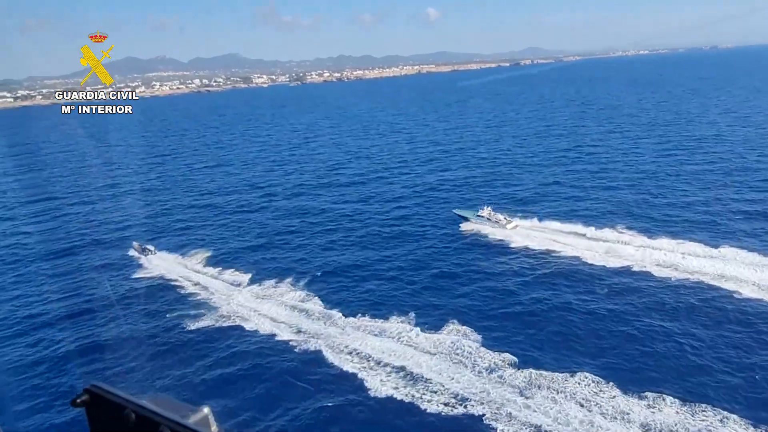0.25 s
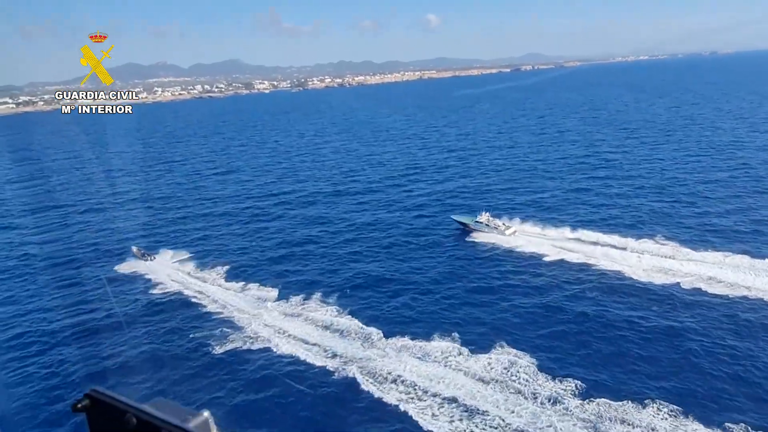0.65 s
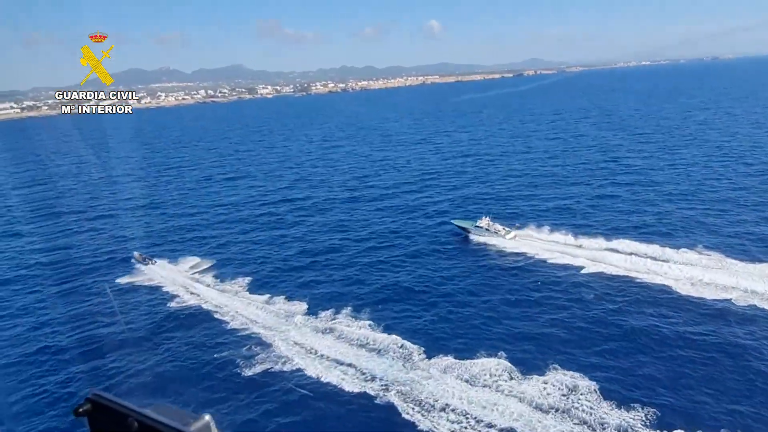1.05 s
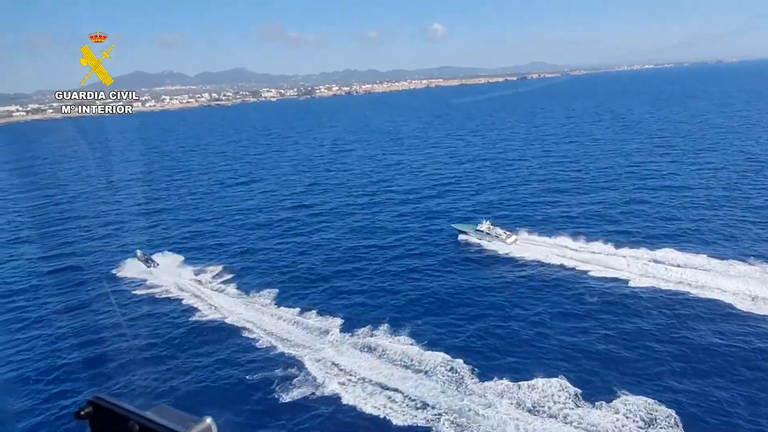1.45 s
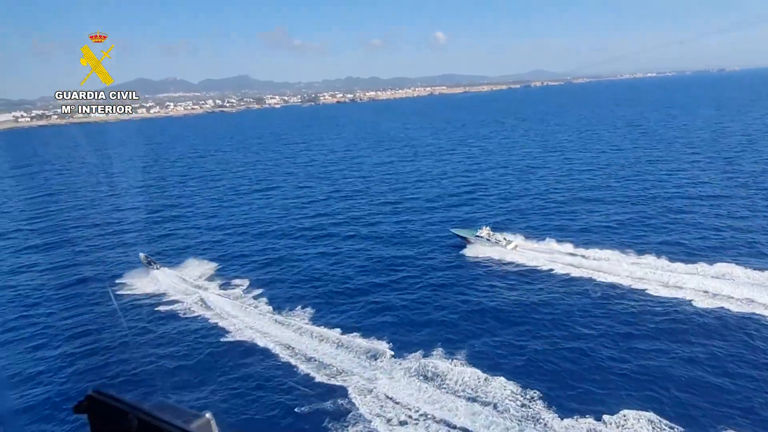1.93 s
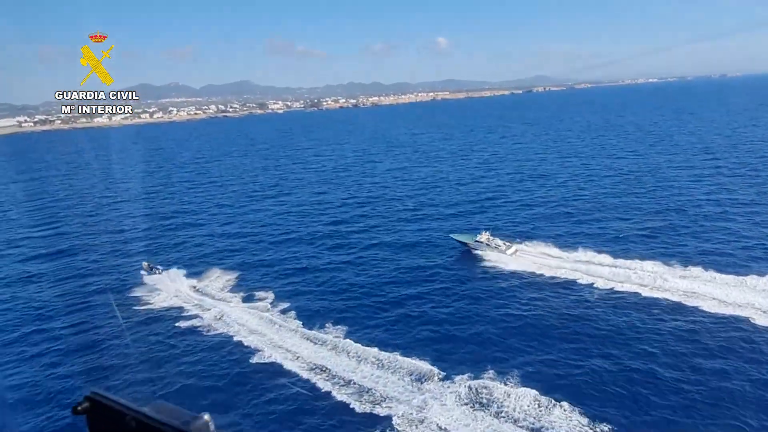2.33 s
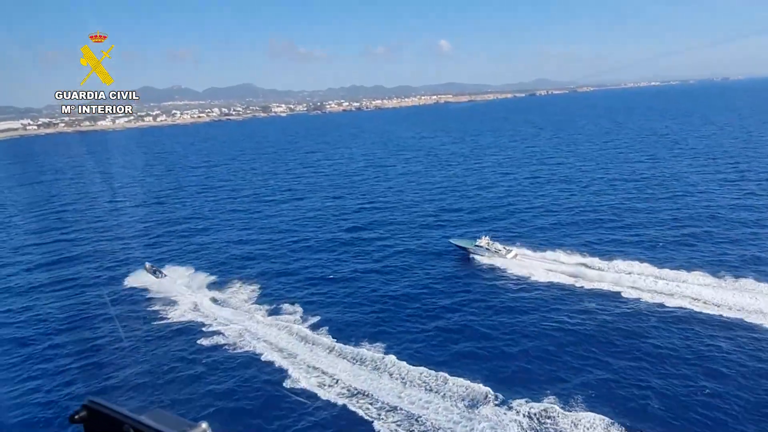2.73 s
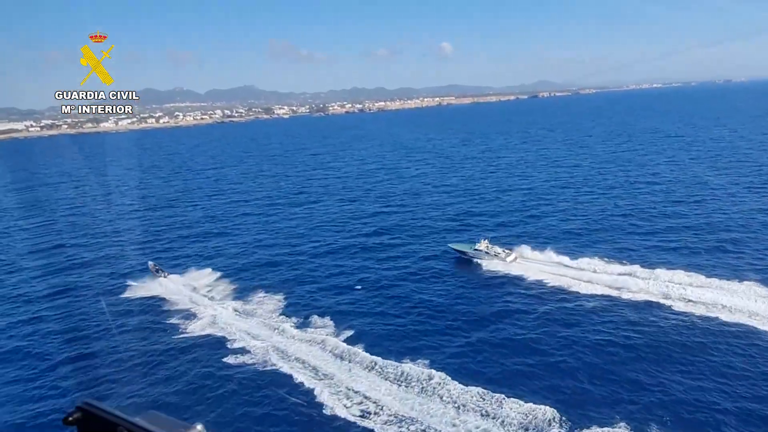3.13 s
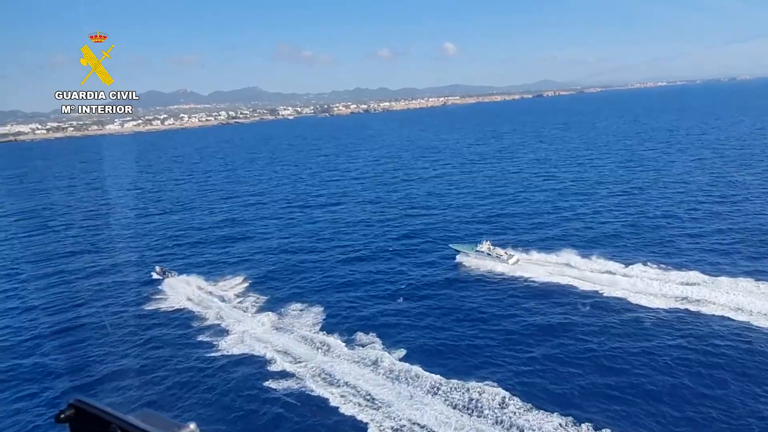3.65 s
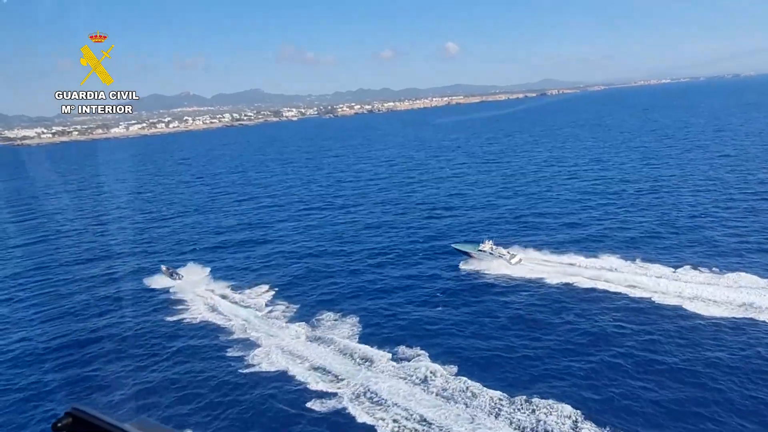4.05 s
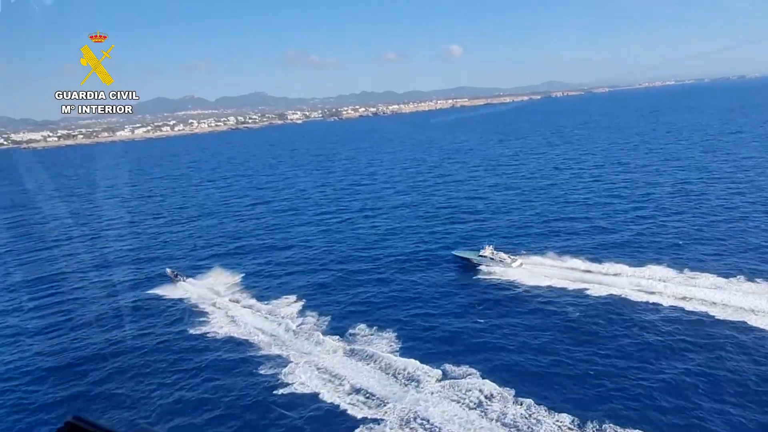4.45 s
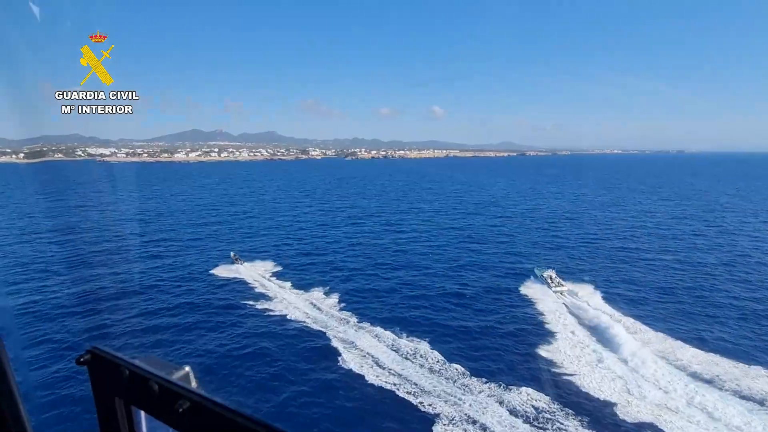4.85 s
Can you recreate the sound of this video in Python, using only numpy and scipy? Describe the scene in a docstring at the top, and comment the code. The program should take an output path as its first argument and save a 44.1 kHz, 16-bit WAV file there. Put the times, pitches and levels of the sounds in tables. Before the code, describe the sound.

Heard from inside a helicopter cabin, in stereo: loud booming air roar along the hull, a rapid deep rotor throb, a mid-pitched fan hum and a steady high gear whine stronger on the left. The rumble bumps briefly now and then, the air swells once midway, a low drone strengthens after four seconds, then everything cuts to silence.

```python
"""Inside the cabin of a turbine helicopter in steady flight, heard at two microphones, in stereo.
From the start, filtered noise roars along the hull, while sines make the tail fan's hum, the gearbox's whine
and the throb of the four-blade main rotor. The rumble surges briefly now and then, and the air swells once
after about two and a half seconds. A rotor drone grows strong after four seconds. Shortly afterwards
the sound is switched off, and silence follows."""
import sys
import numpy as np
from scipy import signal
from scipy.fft import rfft, irfft, next_fast_len
from scipy.io import wavfile

SR = 44100
rng = np.random.default_rng(int(sys.argv[2]) if len(sys.argv) > 2 else 0)


def wav_out(sig):
    """Save sig, one row per channel (or a flat mono array), as 16-bit PCM at SR to the path in sys.argv[1]."""
    wavfile.write(sys.argv[1], SR, np.round(np.clip(np.atleast_2d(sig).T, -1, 1) * 32767).astype(np.int16))


N = 224733
SECONDS = np.arange(N) / SR
# at nominal speed: turns of the rotor shaft per second, and pitch of the main gear teeth meeting
SHAFT_HZ, MESH_HZ = 6.795, 2330.4
BLADES = 4


def undb(db):
    """Decibels to gain."""
    return 10 ** (np.asarray(db) / 20)


def curve(table):
    """A table of (time, value) joined by straight lines, with a value at every sample."""
    return np.interp(SECONDS, *np.array(table).T)


def swing(table):
    """A curve at every sample, as its departure from the mean of the table's values."""
    times, values = np.array(table).T
    return np.interp(SECONDS, times, values - values.mean())


def over_pitch(hz, table, axis=1):
    """One column of a spectrum, joined by straight lines on a log-frequency axis."""
    rows = np.array(table)
    return np.interp(np.log(hz + 1), np.log(rows[:, 0]), rows[:, axis])


def spectrum_axis():
    """A fast transform length, and the frequency of each of its bins."""
    size = next_fast_len(N)
    return size, np.arange(size // 2 + 1) * SR / size


def walk(rate_hz):
    """Smooth random wandering of spread 1 that changes about rate_hz times a second."""
    size, hz = spectrum_axis()
    smooth = rfft(rng.standard_normal(size)) / (1 + (hz / rate_hz) ** 2)
    x = irfft(smooth, size)[:N]
    return x / x.std()


def tone(phase, left_db, right_db, lead_rad):
    """A sine as it reaches the two microphones, louder or earlier at one of them."""
    left = undb(left_db) * np.sin(phase + lead_rad)
    right = undb(right_db) * np.sin(phase)
    return np.sqrt(2) * np.array([left, right])  # so that the levels are RMS


def scattered(phase, rate_hz):
    """The part of a tone that comes by way of shaking panels, with wandering size and phase."""
    return (walk(rate_hz) * np.sin(phase) + walk(rate_hz) * np.cos(phase)) / np.sqrt(2)


# likeness of the rushing air at the two microphones: pitch_hz, correlation (1 same, -1 opposite)
LIKENESS = [(30, 0.88), (130, 0.97), (290, 0.86), (640, 0.53), (1400, -0.31), (3100, 0.16), (6800, -0.23),
            (15000, 0.042)]


def rushing_air(size, hz):
    """Spectrum of white noise from turbulent air, more or less alike at the two microphones."""
    alike = np.clip(over_pitch(hz, LIKENESS), -.99, .99)
    shared, opposed = rfft(rng.standard_normal((2, size))) * np.sqrt(SR / 2)
    opposed = opposed * np.array([[1], [-1]])
    return np.sqrt((1 + alike) / 2) * shared + np.sqrt((1 - alike) / 2) * opposed


# colour of the air along the hull, before trims: pitch_hz, left_db and right_db (dB per Hz)
HULL_ROAR = [(12, -59.5, -62.5), (36, -55.5, -57.5), (51.7, -45, -43.5), (80, -41, -43),
             (104, -43.5, -43.5), (129.3, -41, -40), (172, -49, -47), (192.7, -49.5, -44.5),
             (218.6, -40.5, -41), (246, -41, -41), (290, -41.5, -41), (325, -49, -43.5), (415, -46.5, -45),
             (510, -51.5, -51), (564, -48.5, -49.5), (844, -60, -52.5)]
# colour of the hiss of window seals and turbines, same columns
SEAL_HISS = [(860, -55.5, -57.5), (1260, -61.5, -56.5), (1800, -62, -59.5), (2130, -64.5, -65),
             (2940, -66, -68.5), (3125, -69.5, -71), (3960, -68, -76), (4800, -70.5, -76.5),
             (5690, -68.5, -80.5), (7660, -74, -81.5), (9100, -85.5, -86), (9840, -79, -80),
             (14000, -75, -80.5), (15600, -74.5, -80)]


def hull_colour_db(hz, ripple_db=1.32):
    """The hull and seals colour the noise; crowded cabin modes ripple it differently at each microphone."""
    rows = list(HULL_ROAR) + list(SEAL_HISS)
    colour_db = np.array([over_pitch(hz, rows, axis=c) for c in (1, 2)])
    modes_hz = np.geomspace(300, 9000, 220)
    for side in range(2):
        colour_db[side] += ripple_db * np.interp(hz, modes_hz, rng.standard_normal(len(modes_hz)), 0, 0)
    return colour_db


# narrow rushing bands of panels and seals, the highest from the compressor, before the 9 kHz dip:
# centre_hz, width_hz, left_db and right_db (dB per Hz)
WHISTLES = [(812, 40, -55, -54), (2545, 55, -58.5, -72), (2810, 40, -66, -66), (3250, 60, -66, -73),
            (4130, 70, -69, -85), (4485, 70, -62.5, -76), (5540, 220, -67, -77), (6425, 40, -70, -85),
            (12540, 480, -64, -68), (12556, 60, -55.3, -60)]


def whistling_bands(hz):
    """Panels, seals and compressor resonate in narrow bands; returns their power at each frequency."""
    power = 0
    for centre_hz, width_hz, left_db, right_db in WHISTLES:
        resonance = 1 / (1 + (2 * (hz - centre_hz) / width_hz) ** 2)
        power = power + undb([[left_db], [right_db]]) ** 2 * resonance
    # the microphones are nearly deaf to these bands around 9 kHz
    return power * np.clip(1.1 - np.exp(-((hz - 9000) / 1500) ** 2), 0, 1)


GUST_S, GUST_WIDTH_S, GUST_DB = 2.63, 0.2, 2


def gust_db():
    """The airflow swells once and eases off again; in dB."""
    return GUST_DB * np.exp(-((SECONDS - GUST_S) / GUST_WIDTH_S) ** 2)


# brief surges of the rumble: peak_s, centre_hz, lift_db (of the surging band)
SURGES = [(.14, 90, 5.5), (.22, 900, 2.5), (.45, 120, 1), (.7, 400, 3.5), (1.2, 105, 5.5), (1.75, 640, 5),
          (2.13, 240, 0.5), (2.2, 400, 0.5), (2.5, 600, 3.5), (2.78, 80, 6), (2.92, 240, 6),
          (3.04, 110, 4.5), (3.5, 110, 4), (3.88, 640, 4.5)]
# half length and half width of a surge
SURGE_S, SURGE_OCTAVES = .045, .55


def surging(sound):
    """Each surge lifts one region of the rumble for a moment."""
    size, hz = spectrum_axis()
    out, spectrum = sound, rfft(sound, size)
    for peak_s, centre_hz, lift_db in SURGES:
        octaves_away = np.log2((hz + 1) / centre_hz)
        band = irfft(spectrum * np.exp(-(octaves_away / SURGE_OCTAVES) ** 2), size)[:, :N]
        moment = np.exp(-((SECONDS - peak_s) / SURGE_S) ** 2)
        out = out + band * (undb(lift_db * moment) - 1)
    return out


# level of the cabin boom, used as departure from its mean: time_s, level_db
BOOM = [(0, -25), (.35, -20.5), (1, -20.5), (1.9, -22), (2.25, -17.5), (2.6, -24), (3, -18.5), (3.6, -19.5),
        (4.1, -20.5), (4.65, -21)]
BOOM_HZ, BOOM_WIDTH_HZ = 247, 84
# the wake of each blade beats on the hull and pulses the roar: multiple of the blade rate, depth_db
WAKE = [(1, .25), (2, .35), (3, .45)]


def airflow(turn, roar_db=-0.5, hiss_db=0.13, buffet_db=0.5, flicker_db=0.5, boom_waver_db=.9):
    """Turbulence heard through the hull: a booming roar that beats with the blades, and a smoother hiss."""
    size, hz = spectrum_axis()
    noise = rushing_air(size, hz)
    sound = noise * np.sqrt(undb(hull_colour_db(hz)) ** 2 + whistling_bands(hz))
    low = 1 / (1 + (hz / 1200) ** 2)  # the share of roar; the rest is hiss
    in_boom = np.exp(-((hz - BOOM_HZ) / BOOM_WIDTH_HZ) ** 2)
    boom = irfft(sound * low * in_boom, size)[:, :N]
    boom = boom * undb(swing(BOOM) + boom_waver_db * walk(5.4))
    rush = irfft(sound * low * (1 - in_boom), size)[:, :N]

    beat_db = sum(depth_db * np.cos(multiple * BLADES * turn) for multiple, depth_db in WAKE)
    roar = (boom + rush) * undb(roar_db + gust_db() + beat_db + buffet_db * walk(29))
    hiss = irfft(sound * (1 - low), size)[:, :N]
    hiss = hiss * undb(hiss_db + 0.5 * gust_db() + flicker_db * walk(40))  # the gust lifts hiss less
    return surging(roar) + hiss


# tail fan hum at nominal speed, before trims: pitch_hz, left_db, right_db, lead_rad (left leads)
FAN = (836.7, -34.7, -28.6, -.8)
# thrust of the tail fan, used as departure from its mean: time_s, level_db
THRUST = [(0, -34.5), (.3, -34), (.75, -36), (1.05, -38), (1.25, -37.5), (1.65, -34), (2.3, -35.5),
          (2.62, -32.5), (3, -33.5), (3.35, -33.5), (3.7, -37.5), (4.05, -39), (4.35, -32.5), (4.65, -34)]


def tail_fan(clock, fan_db=-0.53, scatter_db=-14, scatter_hz=7):
    """The fan blades hum on one pitch, louder with thrust; a little of it wavers through the panels."""
    pitch_hz, left_db, right_db, lead_rad = FAN
    phase = 2 * np.pi * pitch_hz * clock
    waver = np.array([undb(db + scatter_db) * scattered(phase, scatter_hz) for db in (left_db, right_db)])
    hum = tone(phase, left_db, right_db, lead_rad) + waver
    return undb(fan_db + swing(THRUST)) * hum


# shafts and lesser gears at nominal speed, before trims: pitch_hz, left_db, right_db, lead_rad (left leads)
SHAFT_TONES = [(98.7, -32, -32.3, .1), (101.3, -37.4, -31.8, .4), (241.1, -33.5, -28.5, -.2),
               (355.8, -35.5, -34, .1), (449, -45, -39.5, -.3), (672.2, -39, -38.4, -.8),
               (726.3, -55, -43, 2.4), (903.1, -44.4, -37.8, -2.9), (1237.5, -51, -49.5, 1.3),
               (1344.3, -52, -49, 2.5), (2016.3, -52, -45.7, -1), (2219.2, -60, -50, 0),
               (2563.3, -47.3, -59, -1.2), (2828.9, -42.7, -37.2, -2.1), (4661, -48.6, -62, -2.7),
               (5498.5, -47.3, -57.5, -2.2), (5657.6, -45.4, -53.3, 1.5), (6991.5, -54.3, -72, -2.5),
               (8486.5, -72, -66, 0)]


def drive_train(clock, tones_db=-0.6, scatter_db=-9, scatter_hz=6, scatter_db_per_octave=-1.8):
    """Shafts and gears turn in fixed ratio; a share of each tone wavers, smaller for the high ones."""
    out = 0
    for pitch_hz, left_db, right_db, lead_rad in SHAFT_TONES:
        phase = 2 * np.pi * pitch_hz * clock + rng.uniform(0, 2 * np.pi)
        share_db = scatter_db + scatter_db_per_octave * np.log2(pitch_hz / MESH_HZ)
        waver = np.array([undb(db + share_db) * scattered(phase, scatter_hz) for db in (left_db, right_db)])
        out = out + tone(phase, left_db, right_db, lead_rad) + waver
    return undb(tones_db) * out


# main gear whine, before torque and flutter: left_db, right_db, lead_rad (left leads)
MESH = (-26, -36.5, -0.86)
# torque on the main gears, used as departure from its mean: time_s, level_db
TORQUE = [(0, -32.5), (.55, -33.5), (.87, -31.8), (1.02, -33.2), (1.22, -32), (1.55, -32.5), (2.1, -33),
          (2.52, -31.3), (2.65, -32.5), (3.05, -32), (3.5, -32.5), (4.05, -33.5), (4.35, -32.8), (4.6, -31)]
# the input shaft shakes the mesh at its own rate (at nominal speed)
INPUT_SHAFT_HZ = 101.3


def gearbox(clock, turn, sway_rad=0.04, swell_db=0.26, scatter_db=-42, scatter_hz=32):
    """The main gears whine; blade passes and shaft turns strain the teeth and shake level and phase."""
    phase = 2 * np.pi * MESH_HZ * clock
    blade = BLADES * turn
    # how far each cause shakes the level, as a fraction at the left microphone
    strain = 0.12 * np.cos(blade) + 0.025 * np.cos(2 * blade) + 0.028 * np.cos(turn)
    strain = strain + 0.04 * np.cos(2 * np.pi * INPUT_SHAFT_HZ * clock)
    twist = sway_rad * (np.sin(turn) - np.sin(blade) - np.sin(2 * blade))
    # the right microphone lies near a node of the tone, where the flutter is deeper
    depth = np.array([[1], [2.6]])
    whine = (1 + depth * strain) * tone(phase + twist, *MESH)
    whine = whine * undb(swing(TORQUE) + swell_db * walk(4))
    waver = np.array([scattered(phase, scatter_hz) for _ in range(2)])
    return whine + undb(scatter_db) * waver


# rotor pressure waves, before load, drone and waver:
# multiple of the shaft rate, left_db, right_db, lead_rad (left leads)
ROTOR = [(4, -30.8, -27.5, .5), (8, -21.7, -19.8, 1), (9, -32, -30.5, .2), (11, -32, -32, .3),
         (12, -30.3, -30.3, .3), (16, -32, -32.5, -.4), (17, -36, -35, .2), (18, -33.5, -30.5, .2),
         (19, -35, -34, .2), (20, -33, -34.5, .2), (24, -35.3, -35.7, .4), (32, -28.6, -29.6, -.3)]
# load on the blades, heard in the throb as departure from its mean: time_s, level_db
LOAD = [(0, -21), (.3, -20.5), (.76, -18), (.99, -22.5), (1.22, -24), (1.45, -19), (1.87, -17.5),
        (2.15, -19), (2.75, -18.5), (2.92, -21), (3.2, -21), (3.5, -19.3), (3.68, -24.5), (3.87, -18.5),
        (4.03, -25.5), (4.25, -21.5), (4.65, -22)]
# lift of the drone two octaves above the blade rate: time_s, lift_db
DRONE = [(0, 3), (1.5, -2), (3.8, -5), (4.15, 8), (4.65, 6)]


def rotor(turn, unsteady=0.13, throb_db=0.2, waver_db=0.4, waver_hz=3):
    """Blade passes make the deep throb; unequal blades add other multiples of the shaft rate."""
    out, load_db = 0, swing(LOAD)
    for multiple, left_db, right_db, lead_rad in ROTOR:
        phase = multiple * turn + rng.uniform(0, 2 * np.pi)
        if multiple == BLADES:  # the blade rate itself is steady
            gain = 1
        elif multiple == 2 * BLADES:  # its octave, the throb, follows the load
            gain = undb(throb_db + load_db + waver_db * walk(waver_hz))
        else:  # the other waves ride on turbulence
            gain = 1 + unsteady * walk(1)
            phase = phase + unsteady * walk(1)
        if multiple == 4 * BLADES:
            gain = gain * undb(curve(DRONE))
        out = out + gain * tone(phase, left_db, right_db, lead_rad)
    return out


# the governor lets the speed wander a little, given as pitch of the main gear mesh: time_s, pitch_hz
SPEED = [(0, 2331.6), (.6, 2329.2), (1.2, 2330.7), (1.8, 2330.8), (2.4, 2329.9), (3, 2330.3), (3.7, 2331.9),
         (4.65, 2330.7)]


def scene():
    """One governed drive train turns everything; the airflow surrounds it."""
    # time as the machinery counts it, a little fast or slow with its speed
    clock = np.cumsum(curve(SPEED) / MESH_HZ) / SR
    turn = 2 * np.pi * SHAFT_HZ * clock  # angle of the rotor shaft, in radians
    machinery = tail_fan(clock) + drive_train(clock) + gearbox(clock, turn) + rotor(turn)
    return airflow(turn) + machinery


# middle and length of the switch-off, ceiling of the rounding (sample value), top of the pitch range
OFF_S, OFF_FADE_S, CEILING, TOP_HZ = 4.669, .008, .92, 15520


def record(dry):
    """The loudest peaks are rounded; the sound is switched off within milliseconds; the top is cut steeply."""
    rounded = dry / (1 + (dry / CEILING) ** 6) ** (1 / 6)
    on = np.clip((OFF_S - SECONDS) / OFF_FADE_S + .5, 0, 1)
    top_cut = signal.ellip(12, .1, 80, TOP_HZ, fs=SR, output="sos")
    return signal.sosfilt(top_cut, rounded * on)


dry = scene()
out = record(dry)
wav_out(out)
```